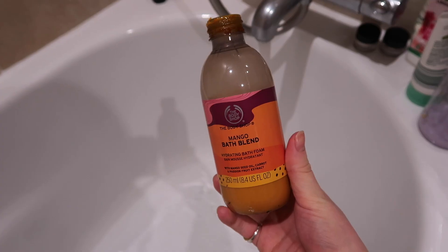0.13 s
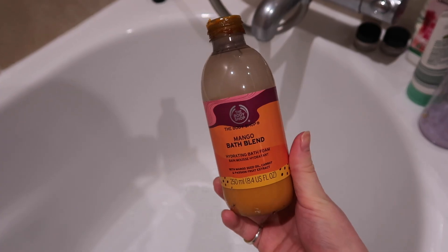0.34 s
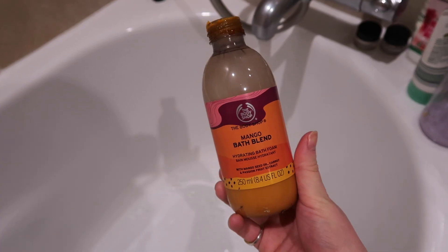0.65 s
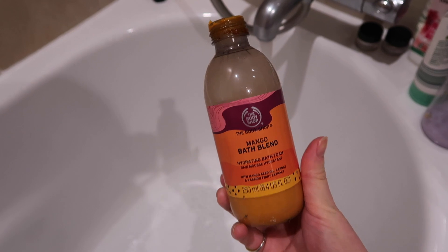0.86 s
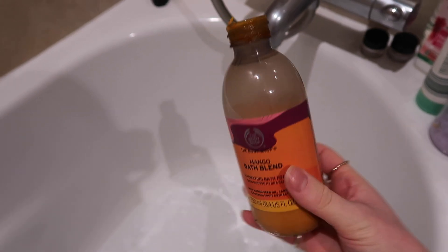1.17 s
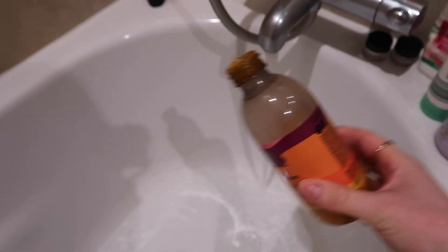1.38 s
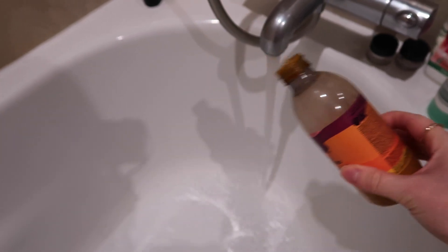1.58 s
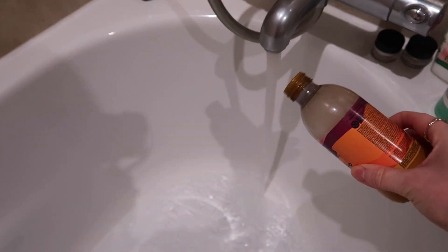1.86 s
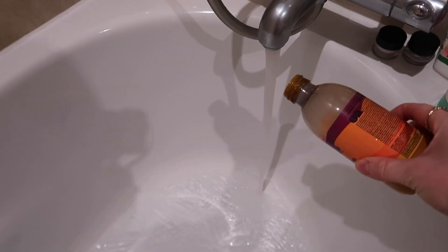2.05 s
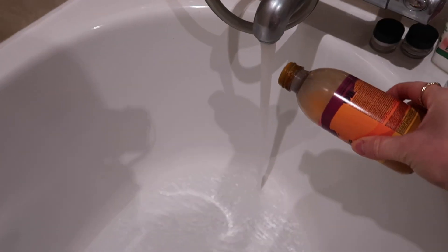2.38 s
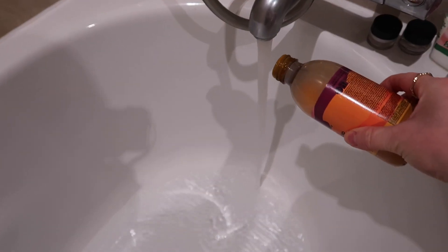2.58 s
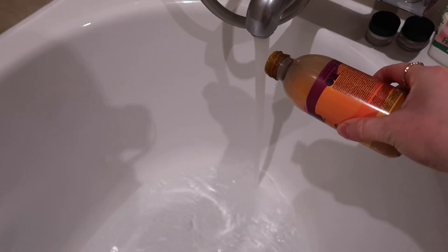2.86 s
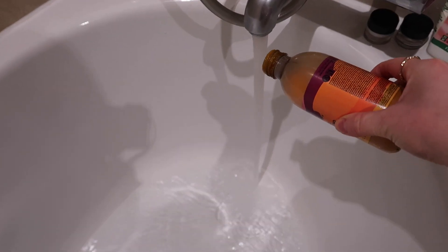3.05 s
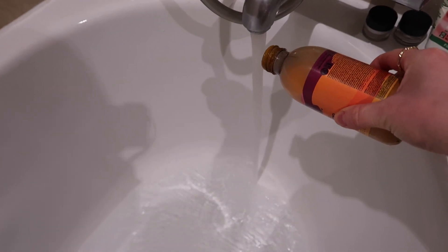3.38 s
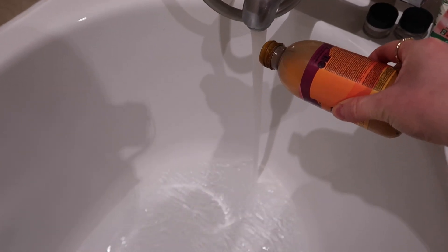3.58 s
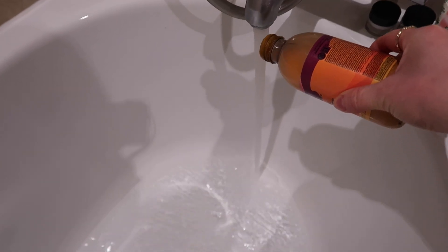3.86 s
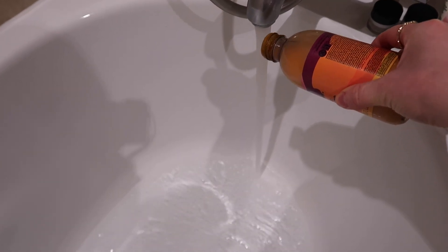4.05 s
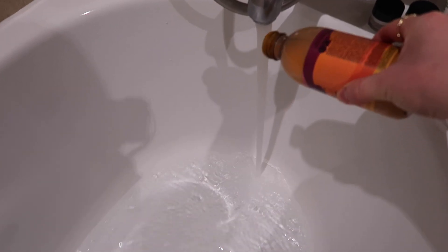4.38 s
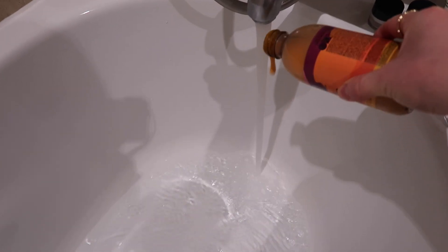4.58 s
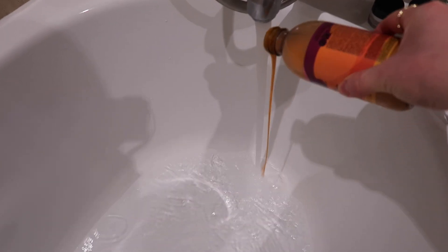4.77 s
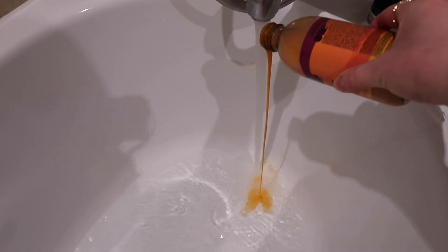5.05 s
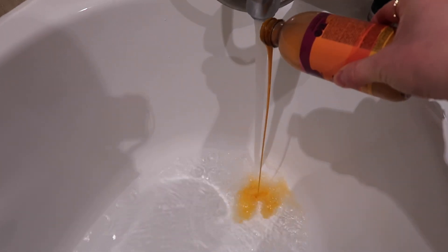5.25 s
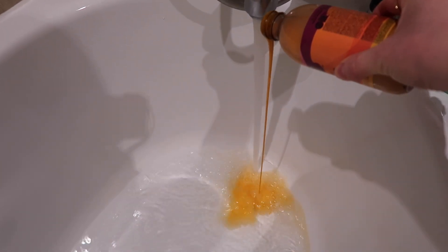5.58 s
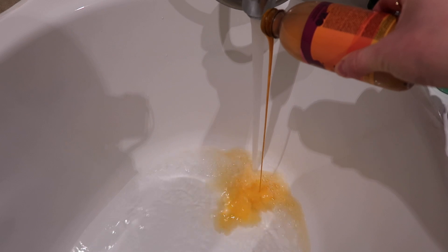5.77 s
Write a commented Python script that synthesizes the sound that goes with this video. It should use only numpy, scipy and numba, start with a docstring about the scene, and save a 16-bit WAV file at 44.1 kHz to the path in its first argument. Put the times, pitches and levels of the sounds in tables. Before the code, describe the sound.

Steady running water fills a bath, heard close on a phone with short, dense reflections from tub and tiles. The first second is uneven and a little muffled; then the splash becomes clearer, with a hollow tub ring. High bubble pips pop throughout, and drops tick on enamel near 1.7 and 2.7 seconds. Quiet hum and pipe drone sit far below the water.

```python
"""Bath tap in a tiled bathroom

A tap runs into shallow water near a phone: hiss and decaying bubble tones excite tub modes and a dense room tail.
A bottle held near the phone first shades the stream, then moves to the tap, so the colour opens.
Lone and clustered bubbles ring out and three drops spit on the enamel as short noise ticks.
A sine mains hum, a narrow-band pipe drone and a broad rumble lie underneath, as filtered noise but for the hum.
"""
import sys
import numpy as np
from scipy import signal
from scipy.fft import rfft, irfft, next_fast_len
from scipy.io import wavfile
from scipy.ndimage import uniform_filter1d
from numba import njit

SR = 44100
rng = np.random.default_rng(int(sys.argv[2]) if len(sys.argv) > 2 else 0)


def put_to_file(sound):
    """Save the sound as 16-bit audio at rate SR, in the file named by the first command-line argument."""
    columns = np.atleast_2d(sound).T  # one column per channel
    safe = np.clip(columns, -1, 1)
    whole_steps = np.round(safe * 32767)
    wavfile.write(sys.argv[1], SR, whole_steps.astype(np.int16))


N = 261433
LONG = next_fast_len(N + SR, True)  # transform length with room for tails
FREQ = np.maximum(np.fft.rfftfreq(LONG, 1 / SR), 1)  # Hz, kept off zero

# level of side against mid, narrow in the low and middle range, widest in the treble: pitch_hz, side_minus_mid_db
SIDE_AGAINST_MID = [(60, -39), (110, -34), (200, -7.5), (370, -13), (670, -19.5), (1230, -35), (2250, -22),
                    (4120, -4), (7540, 0), (13800, 7.5)]


def undb(db):
    """Decibels to amplitude ratio: 20 dB a decade."""
    return 10 ** (np.asarray(db) / 20)


def rms(x):
    """Effective value: the root of the mean power."""
    return np.sqrt(np.mean(x ** 2))


def curves(table):
    """Linear interpolation in time: each column of a (s, value, ..) table becomes one value a sample."""
    s, *columns = np.transpose(table)
    return [np.interp(np.arange(N) / SR, s, column) for column in columns]


def gain(table):
    """Spectral envelope: (Hz, dB) points joined by straight lines over log frequency."""
    hz, db = np.transpose(table)
    return undb(np.interp(np.log(FREQ), np.log(hz), db))


def filt(x, response):
    """Convolution theorem: a linear filter multiplies the spectrum."""
    return irfft(rfft(x, LONG) * response, LONG)[..., :N]


def resonance(hz, width_hz):
    """Damped oscillator: unit gain at its pitch, half power across its width."""
    return 1 / (1 + 1j * (FREQ - hz ** 2 / FREQ) / width_hz)


def walk(rate):
    """Slow random modulation: levels held 1 / rate s and slewed twice, spread near 1."""
    hold = int(SR / rate)
    steps = np.repeat(rng.standard_normal(N // hold + 1), hold)
    return 1.5 * uniform_filter1d(uniform_filter1d(steps, hold), hold)[:N]


@njit
def ring(start, hz, size, cycles, glide):
    """Bubble resonance: a tone falls by 1/e every `cycles` periods while its pitch rises by the share `glide`."""
    out = np.zeros(N)
    for b in range(len(start)):
        length = cycles * SR / hz[b]  # samples
        turn = 2 * np.pi * hz[b] / SR  # radians a sample
        z = size[b] + 0j
        step = np.exp(1j * turn - 1 / length)
        bend = np.exp(1j * turn * glide / length)
        for i in range(start[b], min(N, start[b] + int(5 * length))):
            out[i] += z.imag
            z, step = z * step, step * bend
    return out


def bubbles(per_s, low_hz, high_hz, cycles, glide, spread_db, cap_db=8.5):
    """Air entrainment: the jet pulls bubbles under, scaled so that all pitches carry like energy per Hz."""
    when, place, chance = rng.random((int(per_s * N / SR), 3)).T
    hz = low_hz * (high_hz / low_hz) ** place
    excess_db = np.minimum(-spread_db * np.log(1 - chance), cap_db)
    x = ring((when * N).astype(np.int64), hz, hz * undb(excess_db), 1. * cycles, 1. * glide)
    return x / rms(x)


def splash(bubble_db=1.5, fizz_db=-5.0, patter_db=-4.0):
    """Broadband excitation: hiss, ringing bubbles, droplet patter and fine fizz; levels relative to the hiss."""
    big = bubbles(900, 349.2, 13046, cycles=17.85, glide=0.0397, spread_db=2.0, cap_db=5.5)
    patter = bubbles(1500, 893, 5550, cycles=4.4, glide=0.119, spread_db=2.5, cap_db=9.5)
    fizz = bubbles(3500, 4130, 15000, cycles=2.1, glide=0.066, spread_db=3.5, cap_db=5.5)
    hiss = rng.standard_normal(N)
    return hiss + undb(bubble_db) * big + undb(patter_db) * patter + undb(fizz_db) * fizz


def bathroom(t60_s=0.3, direct_db=-0.5):
    """Reverberation: dense decaying echoes off tub and tiles for mid and side; the direct sound is centred."""
    tail = rng.standard_normal((2, SR)) * undb(-60 * np.arange(SR) / SR / t60_s)
    tail /= np.sqrt(np.sum(tail ** 2, axis=1, keepdims=True))
    tail[0, 0] += undb(direct_db)  # relative to the whole tail
    return rfft(tail, LONG)


def tub_modes():
    """Modal superposition: the hollow of the tub responds as a sum of damped resonances."""
    # modes of the tub hollow, relative to each other: pitch_hz, level_db
    modes = [(400, -58), (477, -50), (500, -63.5), (570, -42.5), (627, -58.5), (705, -74), (866, -48),
             (1229, -44), (1335, -51.5), (1388, -44.5), (1587, -44.5), (1813, -48), (1919, -58),
             (2200, -46), (2266, -43.5), (2352, -51), (2470, -43.5), (2586, -50), (3559, -51), (3943, -53),
             (4570, -52), (4953, -49)]
    response = 0
    for k, (hz, db) in enumerate(modes):
        width_hz = 5.2 + 0.0035 * hz
        response = response + (-1) ** k * undb(db) * resonance(hz, width_hz)  # neighbours in opposite phase
    return response


def flicker(x, slow_db=0.4, quick_db=0.8):
    """Independent band modulation: each half-octave swells and flickers alone as the bubble cloud shifts."""
    place = 2 * np.log2(np.clip(FREQ, 300, 300 * 2 ** 5.5) / 300)  # half-octaves above 300 Hz
    out = 0
    for band in range(12):
        share = np.maximum(1 - abs(place - band), 0)
        out = out + filt(x, share) * undb(slow_db * walk(6.5) + quick_db * walk(24.9))
    return out


def stream_db(surge_db=0.35):
    """Amplitude modulation: gurgle, churn and spray share the surges of the jet and each wander alone."""
    # level of the stream by register: start_s, churn_db, gurgle_db
    stream = [(0, -29.5, -37), (.1, -30, -36.5), (.21, -34, -36.5), (.3, -29, -38), (.46, -33.5, -37),
              (.53, -30, -36.5), (.68, -34, -37), (.78, -31.5, -39.5), (.84, -31, -40), (.92, -27.5, -39),
              (1.0, -30, -38), (1.15, -32, -35.5), (1.25, -32, -37), (1.33, -29.5, -39), (1.43, -30, -40.5),
              (1.52, -33.5, -38.5), (1.7, -32, -37), (1.85, -31.5, -38.5), (2.2, -32, -36),
              (2.75, -31, -38), (3.7, -31.5, -36), (4.1, -30.5, -36.5), (4.3, -32, -36), (4.5, -30.5, -36),
              (4.62, -30.5, -36.5), (4.73, -32, -36.5), (4.95, -33, -36), (5.1, -31.5, -35),
              (5.4, -31, -35.5), (5.52, -33, -36.5), (5.62, -31, -37), (5.93, -29.5, -38)]
    # level of the spray, steadier than the stream: start_s, level_db
    spray_levels = [(0, -34.5), (.38, -34), (.46, -38), (.52, -35), (1.2, -34), (1.65, -34), (2.2, -35),
                    (2.75, -33.5), (4.1, -34.5), (5.1, -34), (5.4, -35), (5.93, -38)]
    churn, gurgle = curves(stream)
    spray, = curves(spray_levels)
    surge = surge_db * walk(14)
    wandering = ((gurgle, 0.6), (churn, 0.3), (spray, 0.3))  # level, wander in dB
    return [db + surge + wander_db * walk(12) for db, wander_db in wandering]


def water(tub_db=-10.75, clearing_db=1.5, side_db=-5.5, diffuse_db=3.0):
    """Source and filter: the splash excites room and tub, each layer following the stream; rows are mid and side."""
    # colour of the water with the bottle close to the phone: pitch_hz, density_db
    shaded_colour = [(180, -53), (300, -32), (395, -9.5), (435, -18.5), (464, -6), (528, -11), (778, -2.5),
                     (929, -7), (1510, -4), (1800, -5), (3120, -1), (5960, -8.5), (7590, -7.5),
                     (12500, -18), (14200, -59)]
    # colour of the water with the bottle at the tap: pitch_hz, density_db
    open_colour = [(180, -2), (300, -23), (388, -8), (435, -20), (479, 4), (601, -10.5), (718, -2),
                   (800, -6.5), (900, -2.5), (1100, -8), (1370, 0.5), (1510, -2), (2000, 2), (2330, 3.5),
                   (2740, -1), (3400, -2.5), (4300, -4), (4910, -1.5), (5500, -6.5), (6000, -3), (6670, -8),
                   (12500, -10.5), (14200, -23)]
    # colour of the side signal, nearly empty from 1.1 to 1.8 kHz, full above 2.5 kHz: pitch_hz, density_db
    side_colour = [(150, -49), (250, -14.5), (950, -18), (1090, -30), (1380, -46), (1550, -47), (1780, -38),
                   (2330, -9.5), (2660, 0.5), (2900, -1), (5150, 2.5), (12600, -0.5), (14200, -6)]
    # path of the bottle away from the phone: start_s, open_share (0-1)
    bottle_away = [(0, 0), (1.2, 0.09), (2.0, 0.65), (5.93, 0.74)]

    # the water breaks at two spots, each with its own path through the room
    # repeated to the full transform length, so the room is already ringing at the start
    spots = [np.resize(splash(), LONG) for _ in range(2)]
    room = sum(filt(spot, bathroom()) for spot in spots)

    away, = curves(bottle_away)
    shaded = filt(room[0], gain(shaded_colour))
    clear = filt(room[0], gain(open_colour))
    mid = (1 - away) * shaded / rms(shaded) + away * clear / rms(clear)

    # fresh noise joins the room's side, which makes it smoother and more diffuse
    diffuse = undb(diffuse_db) * rng.standard_normal(N)
    side = filt(room[1] / rms(room[1]) + diffuse, gain(side_colour))
    wet = np.array([mid, side / rms(side) * undb(side_db)])

    # the bottle also hides part of the tub's ring
    hollow = filt(sum(spots), tub_modes())
    wet[0] += hollow / rms(hollow) * undb(tub_db + clearing_db * away)

    wet = filt(flicker(wet), 1 / (1 + (250 / FREQ) ** 6))  # the water carries no deep bass, falling away below about 250 Hz
    below_churn, below_spray = (1 / (1 + (FREQ / edge_hz) ** 6) for edge_hz in (1500, 5000))
    masks = (below_churn, below_spray - below_churn, 1 - below_spray)
    out = 0
    for mask, db in zip(masks, stream_db()):
        layer = filt(wet, mask)
        out = out + layer / rms(layer[0]) * undb(db)
    return out


def house(waver_db=1.3, throb_db=0.5):
    """Tonal and narrow-band noise: mains hum, breathy pipe drone and broad rumble; rows are mid and side."""
    # spectrum of house and pipes: pitch_hz, density_db
    rumble_colour = [(12, -49), (20, -14), (48, -9), (71, -29), (92, -2), (120, -5), (162, -8.5),
                     (315, -6.5), (400, -29), (520, -39), (880, -120)]
    hum_hz, hum_db = 99.8, -49.5
    drone_hz, drone_width_hz, drone_db = 64.4, 5.6, -58.5
    rumble_db = -58
    t = np.arange(N) / SR
    fade_db = -4.5 * np.exp(-t / 0.72)  # hum and drone start lower and creep up

    hum = np.sqrt(2) * np.sin(2 * np.pi * hum_hz * t) * undb(hum_db + fade_db + waver_db * walk(6.14))
    drone = filt(rng.standard_normal(N), resonance(drone_hz, drone_width_hz)) * undb(throb_db * walk(3.5))
    mid_side = np.array([np.ones_like(FREQ), gain(SIDE_AGAINST_MID)])
    rumble = filt(rng.standard_normal((2, N)), gain(rumble_colour) * mid_side)
    out = rumble / rms(rumble[0]) * undb(rumble_db)
    out[0] += hum + drone / rms(drone) * undb(drone_db + fade_db)
    return out


def blips(cycles=15.0, swell_cycles=3.0, glide=0.0046, direct_db=0.5, count=14):
    """Bubble resonance: lone and clustered bubbles swell and ring through the room; rows are mid and side."""
    # bubbles that stand out, strength before the swell: start_s, pitch_hz, strength_db
    lone = [(0.524, 5560, -25), (0.898, 5080, -19), (1.283, 5900, -20), (1.623, 5300, -22),
            (1.663, 7370, -19), (1.669, 5670, -23), (1.87, 3130, -20), (1.879, 3860, -20),
            (2.174, 8800, -19), (2.408, 5870, -24), (3.098, 6100, -17), (3.233, 2510, -24.5),
            (3.524, 5660, -24), (3.658, 1445, -21), (4.225, 6140, -22), (4.867, 4220, -20)]
    # bubbles bursting together: start_s, length_s, pitch_hz, pitch_spread (0-1), top_strength_db
    clusters = [(.08, 0.069, 2920, 0.13, -25), (.27, 0.056, 3180, 0, -33), (.72, 0.086, 2900, 0.1, -31),
                (.87, 0.067, 3020, 0.4, -30), (.95, 0.055, 3130, 0.05, -34), (1.36, .09, 2800, .15, -32),
                (1.53, 0.038, 452, 0.07, -42.5), (2.069, 0.039, 4700, 0.1, -24), (2.44, .04, 480, .03, -42),
                (2.65, .03, 480, .03, -43), (2.76, .04, 480, .03, -41), (3.23, .04, 480, .03, -42),
                (3.74, .08, 480, .04, -42), (2.58, 0.041, 4720, 0, -30), (2.749, 0.049, 2290, 0, -30),
                (3.152, 0.013, 2400, .08, -31), (3.249, .045, 2410, .08, -31),
                (3.772, 0.063, 810, 0.1, -36), (4.07, .08, 4900, 0.12, -22), (4.56, .03, 2780, 0.2, -27),
                (4.82, .03, 2250, 0.1, -30), (4.66, 0.043, 5880, 0.16, -27),
                (5.03, 0.054, 6080, 0.09, -22.5), (5.085, 0.07, 4900, 0.08, -25)]
    s, hz, db = np.transpose(lone)
    for start, length, pitch_hz, spread, top_db in clusters:
        when, place, weakness = rng.random((count, 3)).T
        s = np.append(s, start + length * when)
        hz = np.append(hz, pitch_hz * (1 + spread * (2 * place - 1)))
        db = np.append(db, top_db - 6 * weakness)

    # each tone swells over its first cycles: a ring minus a shorter one gliding at the same rate
    first, pitch, size = (s * SR).astype(np.int64), 1. * hz, undb(db)
    full = ring(first, pitch, size, 1. * cycles, 1. * glide)
    onset = ring(first, pitch, size, 1. * swell_cycles, glide * swell_cycles / cycles)
    mid_side = np.array([np.ones_like(FREQ), gain(SIDE_AGAINST_MID)])
    return filt(full - onset, bathroom(direct_db=direct_db) * mid_side / undb(direct_db))


def spits(t60_s=0.018, rise_s=0.0015):
    """Impact noise: single drops on the enamel make short bright ticks through a broad treble resonance."""
    # drops spitting, strength before decay and resonance: start_s, strength_db, left_minus_right_db
    drops = [(1.657, -31, 0.5), (2.680, -26, -10), (2.689, -23, -11)]
    out = np.zeros((2, N))
    t = np.arange(int(.02 * SR)) / SR
    for s, db, pan_db in drops:
        envelope = undb(db - 60 * t / t60_s) * (1 - np.exp(-t / rise_s))
        tick = rng.standard_normal(len(t)) * envelope
        i = int(s * SR)
        out[:, i:i + len(t)] += tick * undb(np.array([[pan_db], [-pan_db]]) / 2)
    return filt(out, resonance(11600, 8000))


def scene():
    """Superposition: mid and side layers sum, then become left and right, where the spits join."""
    mid, side = water() + blips() + house()
    return np.array([mid + side, mid - side]) + spits()


def record(dry):
    """Band limiting: the left port is a touch quieter and the phone cuts the top steeply."""
    ports = dry * undb(np.array([[-.1], [.1]]))
    top_hz, ripple_db, stop_db = 14050, .2, 80
    return signal.sosfilt(signal.ellip(10, ripple_db, stop_db, top_hz, fs=SR, output="sos"), ports)


dry = scene()
out = record(dry)
put_to_file(out)
```